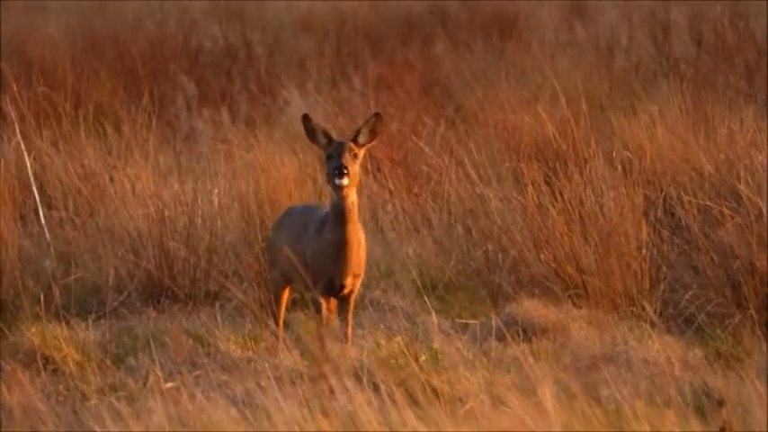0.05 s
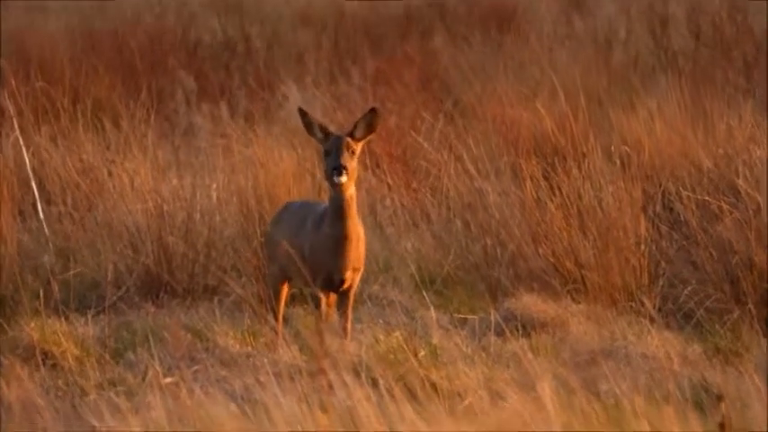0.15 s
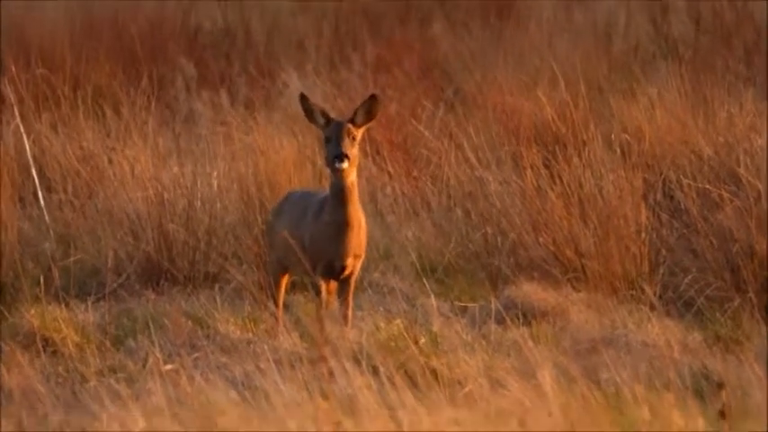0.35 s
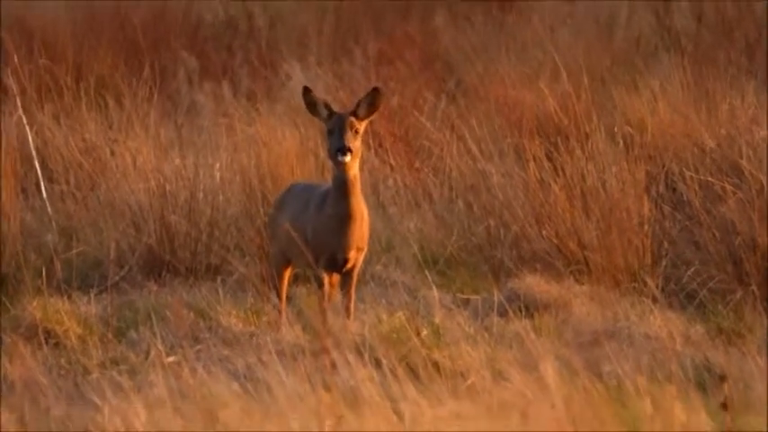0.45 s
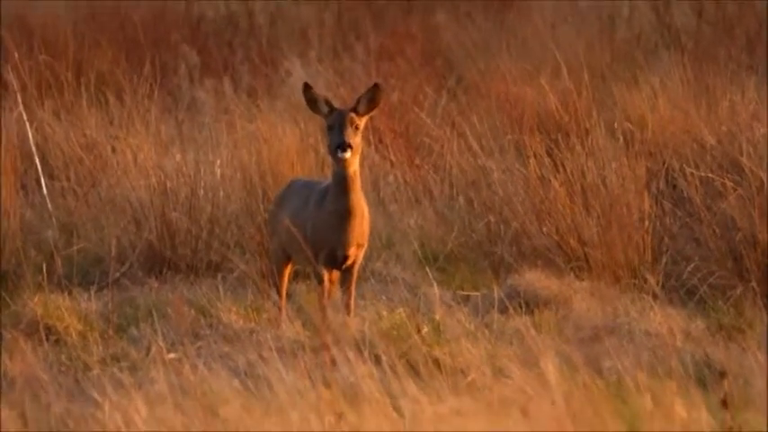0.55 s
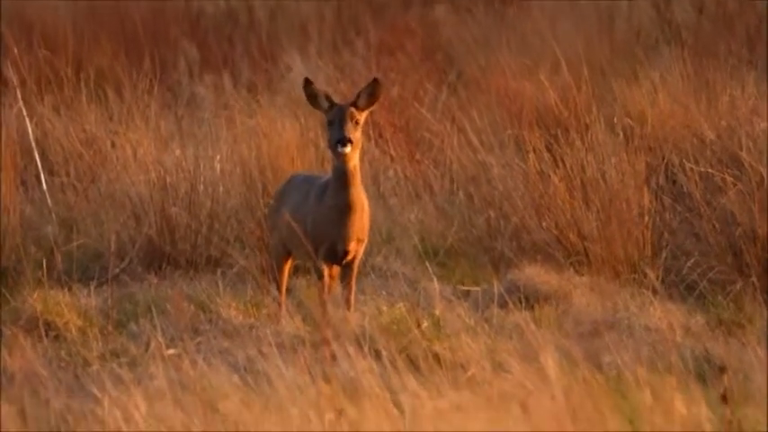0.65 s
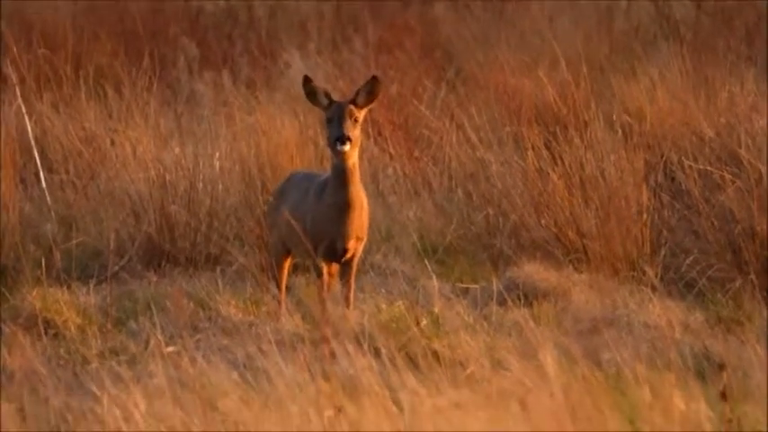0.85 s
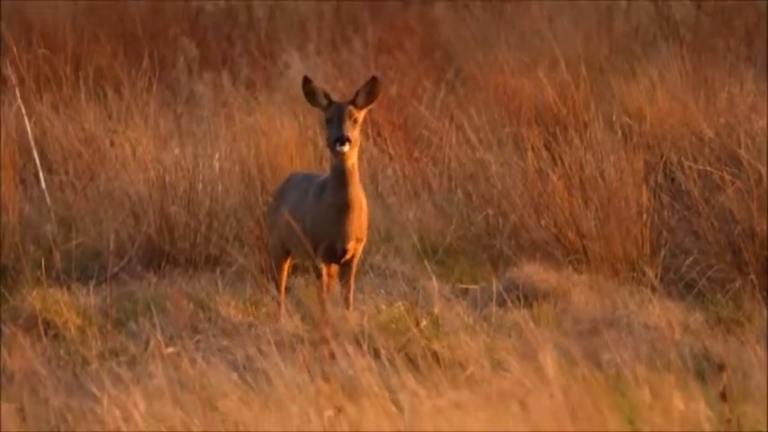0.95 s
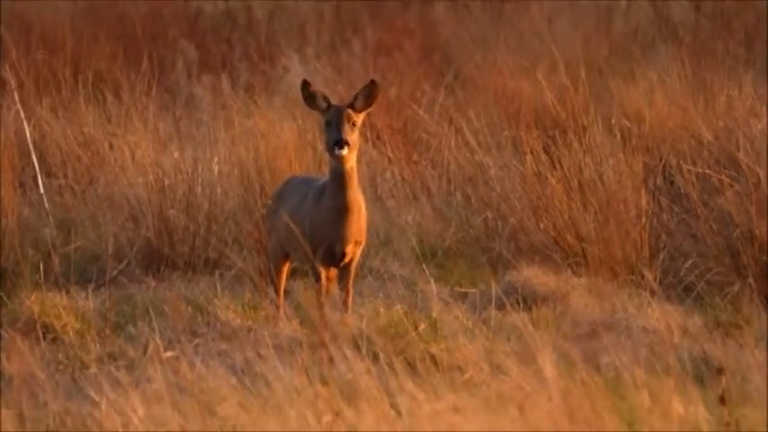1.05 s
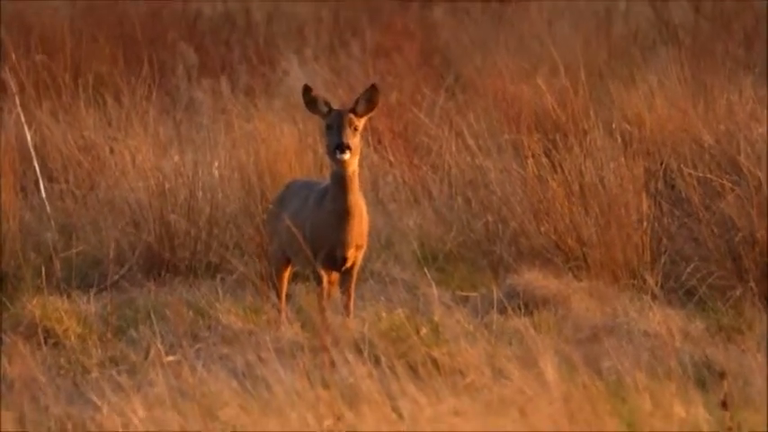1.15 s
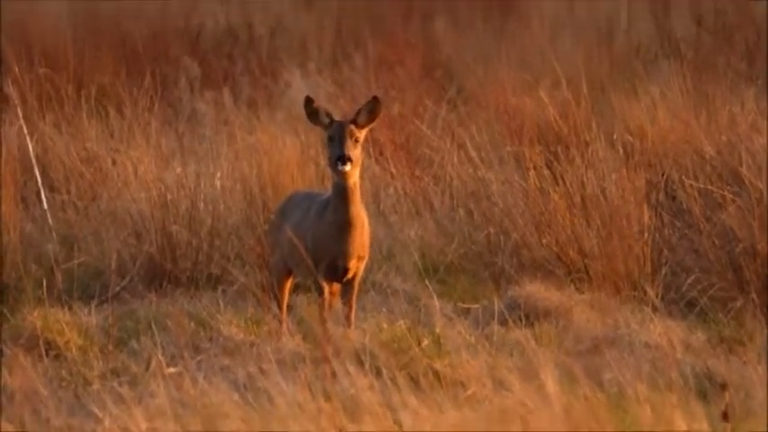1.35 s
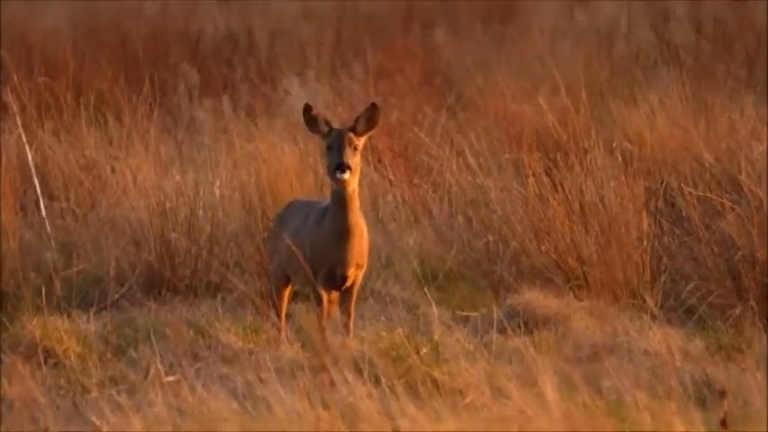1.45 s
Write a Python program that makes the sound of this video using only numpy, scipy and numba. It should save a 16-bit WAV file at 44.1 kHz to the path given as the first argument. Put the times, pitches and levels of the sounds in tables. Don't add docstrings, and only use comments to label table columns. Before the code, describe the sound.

A roe deer gives one short hoarse bark in an open field while frogs croak behind

```python
import sys
import numpy as np
from scipy import signal
from scipy.io import wavfile
from scipy.ndimage import uniform_filter1d
from numba import njit

SR = 44100
rng = np.random.default_rng(int(sys.argv[2]) if len(sys.argv) > 2 else 0)


def magnitude_from_level(level_db):
    exponent = np.asarray(level_db, float) / 20
    return 10 ** exponent


def master_out(mix):
    frames = np.transpose(np.atleast_2d(mix))
    ceiling = np.clip(frames, -1, 1)
    pcm = np.round(ceiling * 32767).astype(np.int16)
    wavfile.write(sys.argv[1], SR, pcm)


N = 66150


def rms_one(x):
    return x / np.sqrt(np.mean(x ** 2) + 1e-20)


def clock():
    return np.arange(N) / SR


def at_hz(points, hz):
    return np.interp(np.log(hz), np.log(np.array(points)[:, 0]), np.array(points)[:, 1])


def drift(rate_hz):
    r = np.exp(-80 * np.pi * rate_hz / SR)
    slow = signal.lfilter([1], [1, -2 * r, r * r], rng.standard_normal(N // 40 + 2002))[2000:]
    return np.interp(np.arange(N) / 40, np.arange(len(slow)), rms_one(slow))


def bump(centre, length):
    return np.exp(-2 * ((clock() - centre) / length) ** 2)


@njit
def resonate(x, hz, width, sr):
    y, r = np.zeros(len(x)), np.exp(-np.pi * width / sr)
    for i in range(2, len(x)):
        drive = (1 - r * r) / 2 * (x[i] - x[i - 2])
        y[i] = drive + 2 * r * np.cos(2 * np.pi * hz[i] / sr) * y[i - 1] - r * r * y[i - 2]
    return y


def steep(x, hz, width_hz):
    x, hz = x + 1e-18, hz + np.zeros(N)
    once = resonate(x, hz, 1.2 * width_hz, SR)
    return resonate(once, hz, 1.2 * width_hz, SR)


def place(x, pan_db, lead_s):
    left = magnitude_from_level(pan_db / 2) * np.interp(clock() - lead_s, clock(), x)
    return np.array([left, magnitude_from_level(-pan_db / 2) * x])


def bark():
    # t/s, level/dB, resonance f/Hz, mouth opening/dB
    effort = [
        (0.166, -89, 1220, -12),
        (.19, -51, 1180, -6),
        (0.207, -37.5, 1250, -5),
        (0.239, -38.5, 1277, 0),
        (0.303, -36.5, 1275, 1.5),
        (0.343, -38, 1200, -2),
        (0.402, -42, 1080, -13),
        (.428, -51, 1130, -12),
        (.47, -66, 1110, -10),
    ]
    # t/s, extra level/dB
    surges = [
        (.231, 5),
        (.267, 6),
        (.277, -6),
        (.291, 6),
        (.310, 7),
        (.323, -7),
        (.337, 3),
        (.375, 3),
        (.404, 4),
    ]
    # f/Hz, width/Hz, level/dB, fade t/s
    throat = [(749, 137, -14.5, 0.35), (1030, 220, -18.5, 0.41), (1660, 600, -21, .40),
              (1949, 194, -2.5, 0.462), (2284, 200, -13, 0.406), (2837, 150, -20.5, 0.372),
              (3396, 820, -30.5, 0.339), (4940, 130, -25, 0.246), (4660, 490, -39, 0.375),
              (6080, 800, -46.5, 0.38), (7780, 400, -44, 0.31), (9500, 2100, -50, 0.38)]
    # centre t/s, f/Hz, level/dB, length/s
    chest = [
        (.19, 205, -53, .03),
        (.29, 250, -57, .025),
        (.385, 240, -58, .025),
        (1.47, 255, -57, .05),
    ]
    fold_hz, fold_jitter, fold_spread_db = 220, .6, 2.3
    hoarse, gate_depth = .9, .8
    wobble_hz, close_s, throat_surge_share = 45, .01, .7

    s, db, hz, open_db = np.transpose(effort)
    level_db, mouth_hz = np.interp(clock(), s, db, -120, -120), np.interp(clock(), s, hz)
    phase = np.cumsum(fold_hz * np.exp(fold_jitter * drift(90))) / SR
    cycle = phase.astype(int)
    size = magnitude_from_level(fold_spread_db * rng.standard_normal(N)[cycle])
    pulses = rms_one(np.diff(cycle, prepend=0) * size)
    breath = rms_one(rng.standard_normal(N) * size * np.exp(-gate_depth * (phase % 1)))
    source = np.sqrt(1 - hoarse) * pulses + np.sqrt(hoarse) * breath

    def fade(at):
        return .5 - .5 * np.tanh((clock() - at) / close_s)

    def even(x):
        return x / np.sqrt(uniform_filter1d(x ** 2, size=450) + 1e-12) * np.std(x)

    voice = even(steep(source, mouth_hz + wobble_hz * drift(30), 174))
    scale = np.std(voice)
    surge_db = sum(d * bump(c, .0045) for c, d in surges)
    mouth_db = np.interp(clock(), s, open_db) + 2.5 + (1 - throat_surge_share) * surge_db
    voice = voice * fade(.415) * magnitude_from_level(mouth_db)
    for k, (f_hz, width, gain_db, end) in enumerate(throat):
        opened = 1 - fade(s[2] + .006 * np.log2(f_hz / 2500)) * (f_hz > 2500)
        ring = even(steep(source, f_hz + wobble_hz * drift(25), width))
        voice = voice - (-1) ** k * magnitude_from_level(gain_db) * fade(end) * opened * ring
    voice = voice / scale * magnitude_from_level(level_db + throat_surge_share * surge_db)
    thuds = sum(magnitude_from_level(d) * bump(c, n) * np.sin(2 * np.pi * f_hz * clock()) for c, f_hz, d, n in chest)
    return voice + thuds


def field_echo(x):
    echo_db, t60_s = -21, .35
    t = clock()[:SR // 2]
    tail = rng.standard_normal((2, len(t))) * magnitude_from_level(-60 * t / t60_s) * (t > .01)
    tail = tail / np.sqrt(np.sum(tail ** 2) / 2)
    return magnitude_from_level(echo_db) * signal.fftconvolve(x[None], tail, axes=1)[:, :N]


def frogs():
    # start t/s, length/s, level/dB
    croaks = [(.012, .05, -38), (.085, .04, -44), (.165, .035, -43), (.25, .03, -41), (.288, .025, -41),
              (.35, .06, -42), (.452, .02, -44), (.49, .05, -45), (.588, .008, -37), (.62, .025, -42),
              (.685, .04, -43), (.733, .025, -41), (.765, .055, -43), (.845, .02, -46), (.875, .045, -42),
              (.97, .045, -45), (1.038, .06, -44), (1.108, .05, -43), (1.213, .015, -42),
              (1.238, .035, -42), (1.279, .008, -40), (1.31, .04, -47), (1.358, .03, -45),
              (1.41, .065, -40), (1.485, .03, -35)]
    # f/Hz, width/Hz, level/dB
    sac_modes = [(498, 30, -16), (675, 95, 0), (800, 100, 0), (1045, 45, -10), (1420, 250, -24)]
    pulse_s, spread_db, gain_db, sag_db_per_s, chorus_db = .0085, 2.5, -2.5, 83, -54

    pulses, draws = np.zeros(N + SR), rng.standard_normal((len(croaks), 2, 20))
    for (s, n, d), (late, size) in zip(croaks, draws):
        at = s + np.cumsum(pulse_s * np.exp(0.2025 * late)) - pulse_s
        pulse_db = d + gain_db + spread_db * size - sag_db_per_s * (at - s)
        pulses[(np.abs(at) * SR).astype(int)] += magnitude_from_level(pulse_db) * (at < s + n)

    def sac(x):
        return sum((-1) ** k * magnitude_from_level(d) * steep(x, f, w) for k, (f, w, d) in enumerate(sac_modes))

    impulse = np.diff(clock() > .1, prepend=False)
    one = np.sqrt(np.sum(sac(impulse) ** 2) / SR / pulse_s)
    chorus = magnitude_from_level(chorus_db) * rms_one(sac(rng.standard_normal(N)))
    return place(sac(pulses[:N]) / one + chorus, -2.5, 0.000641)


def deep_frogs():
    # centre t/s, length/s, level/dB
    hoots = [
        (.38, .05, -60),
        (.53, .04, -59),
        (.635, .04, -58),
        (.74, .06, -58),
        (.91, .05, -54),
        (.99, .05, -53),
        (1.115, .05, -50),
        (1.245, .06, -50),
        (1.425, .06, -51),
        (1.49, .04, -57),
    ]
    # f/Hz, width/Hz, level/dB
    deep_modes = [(321, 39, -0.5), (353.2, 39, 0.5), (595.5, 32.5, -1)]
    hoot_hz, upper_hz, upper_db, width_hz = 360, 603.6, -5.5, 34

    white = rng.standard_normal((2, N))
    bed = magnitude_from_level(-60) * rms_one(sum(magnitude_from_level(d) * steep(white[0], f, w) for f, w, d in deep_modes))
    tone = steep(white[1], hoot_hz, width_hz) + magnitude_from_level(upper_db) * steep(white[1], upper_hz, width_hz)
    tone = tone / np.sqrt(uniform_filter1d(tone ** 2, size=900) + 1e-12)
    calls = tone * sum(magnitude_from_level(d) * bump(c, n * 0.72) for c, n, d in hoots)
    return place(bed + calls, -2.5, .00007)


def birds():
    # start t/s, length/s, start f/Hz, end f/Hz, level/dB
    whistles = [(0, .045, 3300, 3200, -75), (.105, .065, 4400, 4350, -78), (.61, .045, 4900, 4950, -77),
                (.61, .03, 3450, 3300, -71), (.615, .03, 1750, 1680, -67), (.722, .033, 4300, 4520, -76),
                (.758, .028, 4750, 5050, -80), (.89, .16, 3700, 3650, -84), (1.005, .09, 1420, 2080, -68.5),
                (1.22, .045, 2500, 2600, -77), (1.298, .045, 4300, 4550, -76),
                (1.338, .03, 4950, 5120, -77), (1.362, .025, 5100, 4700, -78)]
    out = np.zeros(N)
    for s, n, from_hz, to_hz, d in whistles:
        u = np.clip((clock() - s) / n, 0, 1)
        glide_hz = from_hz * (1 + 0.0133 * drift(126)) + (to_hz - from_hz) * u
        tone = np.sin(2 * np.pi * np.cumsum(glide_hz) / SR)
        out += magnitude_from_level(d + 5) * np.sin(np.pi * u) ** .5 * (u < 1) * tone * (1 + .3 * drift(110))
    return out


def grass():
    # centre t/s, length/s, level/dB
    rustles = [
        (.03, .02, -75),
        (.575, .012, -70),
        (.778, .01, -68),
        (.826, .014, -70),
    ]
    band = signal.butter(2, [2400, 5300], "band", fs=SR, output="sos")
    hiss = signal.sosfilt(band, rng.standard_normal(N))
    return rms_one(hiss) * sum(magnitude_from_level(d) * bump(c, n) for c, n, d in rustles)


def air(patchy_db):
    # f/Hz, spectral level/dB
    spectrum = [(25, -7.5), (100, -3), (250, 1), (500, 1.5), (1200, -1), (2600, -21.5), (5500, -23),
                (15000, -26.5)]
    # centre t/s, length/s, level/dB
    swells = [
        (.11, .07, -3),
        (.6, .15, 2),
        (1.11, .1, 4),
        (1.44, .08, 2.5),
    ]
    # f/Hz, likeness/0-1
    likeness = [(30, .7), (90, 0.77), (220, .93), (600, 0.5), (1800, 0.26), (3000, 0), (9000, 0.53)]

    out, edges = 0, 20 * 2 ** np.arange(0, 10, .5)
    white = rng.standard_normal((2, 2, N))
    swell_db = sum(d * bump(c, n) for c, n, d in swells)
    for k, (low, high) in enumerate(zip(edges, np.append(edges[1:], 19000))):
        band = signal.butter(2, [low, high], "band", fs=SR, output="sos")
        mid, side = signal.sosfilt(band, white[k % 2])
        hz = np.sqrt(low * high)
        alike = np.clip(at_hz(likeness, hz), -1, 1)
        near = np.exp(-np.log2(hz / 1650) ** 2)
        gain = magnitude_from_level(at_hz(spectrum, hz) + near * (swell_db + patchy_db * drift(17.7)))
        out = out + gain * (np.sqrt(1 + alike) * mid + np.sqrt(1 - alike) * side * [[1], [-1]])
    return magnitude_from_level(-56) * rms_one(out)


def scene():
    deer = bark()
    return deer + field_echo(deer) + frogs() + deep_frogs() + birds() + grass() + air(patchy_db=3.5)


def top_cut(x):
    return signal.sosfilt(signal.butter(12, 15640, fs=SR, output="sos"), x)


def record(dry):
    low_pass = signal.cheby2(12, 60, 15850, fs=SR, output="sos")
    return top_cut(signal.sosfilt(low_pass, dry))


dry = scene()
out = record(dry)
master_out(out)
```